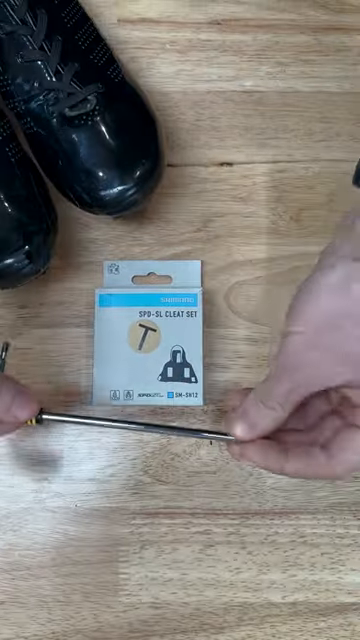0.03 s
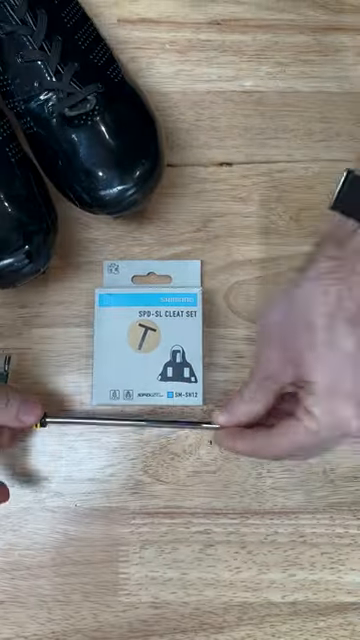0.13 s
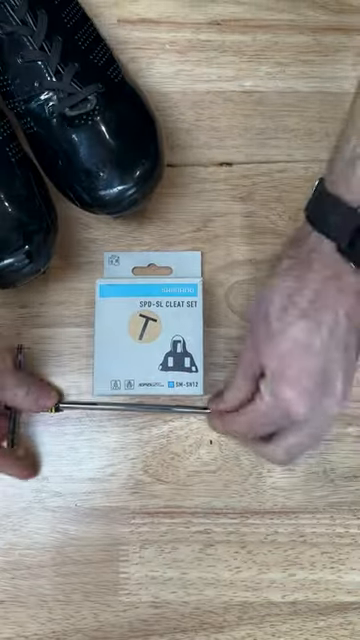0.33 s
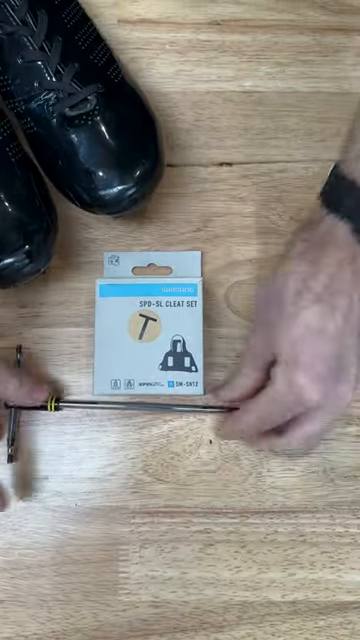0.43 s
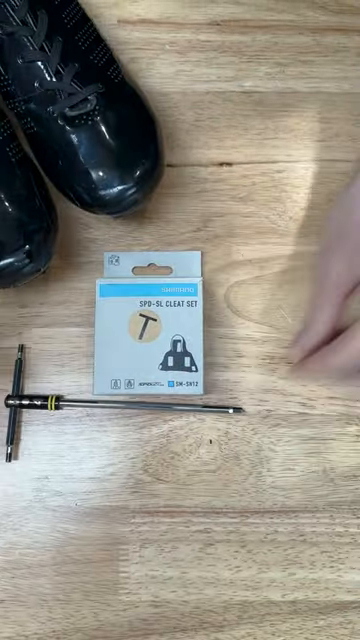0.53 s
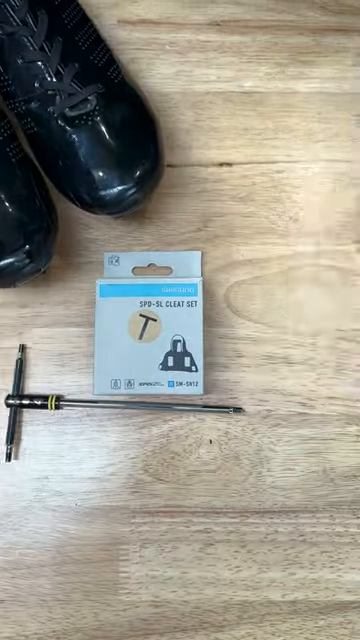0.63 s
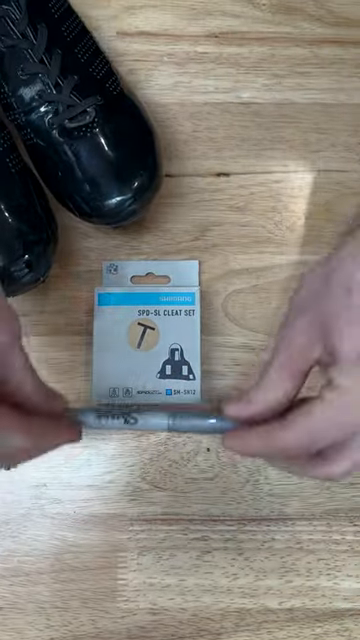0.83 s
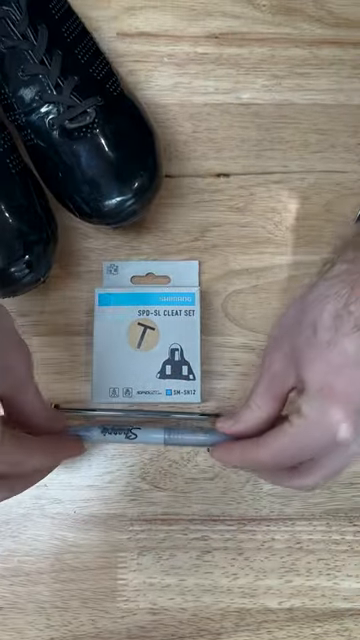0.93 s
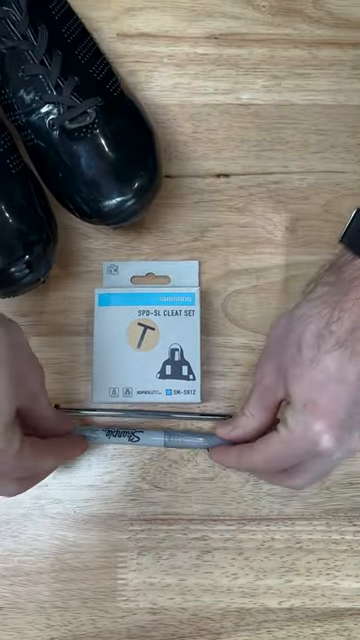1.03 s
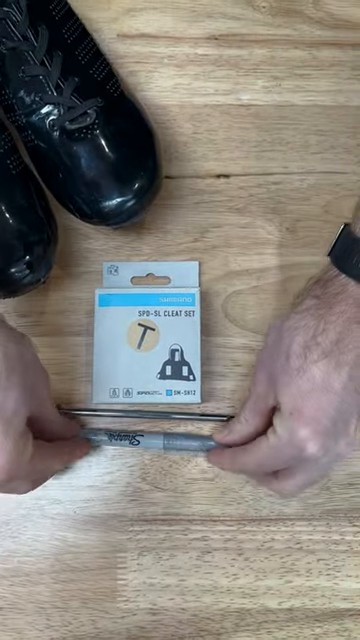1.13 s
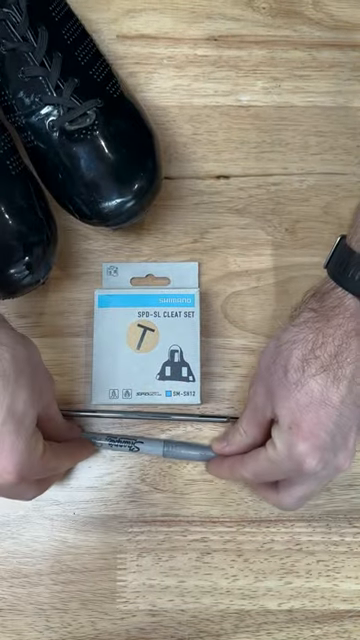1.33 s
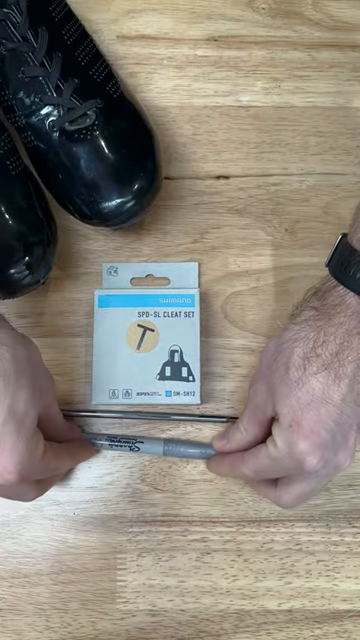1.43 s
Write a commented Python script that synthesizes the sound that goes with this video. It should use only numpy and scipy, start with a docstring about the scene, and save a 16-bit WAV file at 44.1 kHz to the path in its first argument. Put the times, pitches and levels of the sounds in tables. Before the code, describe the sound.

A metal wrench clatters onto a wooden floor, then a marker pen taps down softly.

```python
"""Hex wrench and marker on a wooden floor

In a quiet room a steel T-handle wrench is laid down: one end touches and slides, the shaft clatters
and rings, the heavy handle thuds on the boards and its sliding bar rattles. A light knock and a tick
follow, then a plastic marker pen lands with a softer double tap. A close stereo microphone hears
each contact crack on the wood, and the floor and the room ring."""
import sys
import numpy as np
from scipy import signal
from scipy.io import wavfile

SR = 44100
rng = np.random.default_rng(int(sys.argv[2]) if len(sys.argv) > 2 else 0)


def put_to_file(sound):
    """Save the sound as 16-bit audio at rate SR, in the file named by the first command-line argument."""
    columns = np.atleast_2d(sound).T  # one column per channel
    safe = np.clip(columns, -1, 1)
    whole_steps = np.round(safe * 32767)
    wavfile.write(sys.argv[1], SR, whole_steps.astype(np.int16))


N = 66150
TIME = np.arange(N) / SR
CUTOFF_HZ = 16300

# colour of the wood under the wrench, and under its tip: (frequency [Hz], level [dB per Hz])
STEEL_ON_FLOOR = [(60, -10), (220, 4.5), (320, -3.5), (460, 2), (750, -3.5), (1300, 6.5), (2150, -6.5),
                  (2700, -4), (3600, -28), (6000, -18), (9000, 1.5), (13000, -16), (15500, -13)]
TIP_ON_FLOOR = [(100, -14), (260, -18), (450, 0), (850, 8), (1100, 2), (1600, 4), (2600, 1), (3900, -4),
                (5500, -9.5), (9000, -0.5), (12000, -25.5), (14500, -1)]
# stereo width of the room: (frequency [Hz], side to mid [dB])
ROOM_WIDTH = [(130, -17), (250, -10), (500, 0), (1500, -1), (10000, -0.5)]


def from_db(db):
    """Decibels to gain."""
    return 10 ** (np.asarray(db) / 20)


def at_hz(points, hz):
    """Read a curve on a log-frequency axis."""
    freqs, values = np.array(points).T
    return np.interp(np.log(hz), np.log(freqs), values)


def dying(t, t60):
    """Exponential decay, 60 dB down after t60 seconds."""
    return np.exp(-np.log(1000) * t / t60)


def swell(peak_s, width_s):
    """A smooth rise and fall around a moment."""
    return np.exp(-((TIME - peak_s) / width_s) ** 2 / 2)


def panned(db):
    """Left and right gains for a level difference."""
    return from_db(np.array([[db], [-db]]) / 2)


def filtered(x, hz, kind="low", order=2):
    """Butterworth filter."""
    return signal.sosfilt(signal.butter(order, hz, kind, fs=SR, output="sos"), x + 1e-18)


def through(x, response):
    """Play a force or a sound through a stereo response."""
    return signal.fftconvolve(np.atleast_2d(x), response, axes=1)[:, :N]


def bands(width, size):
    """Yield (centre [Hz], stereo noise) in third octaves, spread by a width curve."""
    edges = 20.4 * 2 ** (np.arange(30) / 3)
    run_in = 4000  # samples for the filters to settle
    white = rng.standard_normal((2, 2, size + run_in))
    for k, (low, high) in enumerate(zip(edges, edges[1:])):
        mid, side = filtered(white[k % 2], [low, high], "band")[:, run_in:]
        hz = np.sqrt(low * high)
        spread = from_db(at_hz(width, hz))
        yield hz, np.array([mid + spread * side, mid - spread * side]) / np.hypot(1, spread)


def hiss(colour):
    """Steady coloured stereo noise, rms 1."""
    noise = sum(from_db(at_hz(colour, hz)) * band for hz, band in bands(ROOM_WIDTH, N))
    return noise / noise.std()


def room_tone():
    """Still air, rumble and a low hum."""
    # colour of the air: (frequency [Hz], level [dB per Hz])
    air = [(25, -17), (58, 1.5), (85, -3), (120, -1.5), (200, -9), (350, -20.5), (700, -21.5), (1400, -37),
           (3200, -45.5), (5700, -35.5), (9000, -54.5), (12000, -53), (16000, -75.5)]
    hum = np.sqrt(2) * np.sin(2 * np.pi * (118.5 * TIME + rng.random()))
    return from_db(-57.5) * hiss(air) + from_db(-61.5) * hum


def soft_swells():
    """A faint hiss swells just before the first touch; later the arms brush as the hands return."""
    # colours of the hiss and the brush: (frequency [Hz], level [dB per Hz])
    hiss_colour = [(300, -20), (900, 2.5), (2000, -1), (4000, -8), (8000, -11), (15000, -21)]
    brush_colour = [(100, -19), (300, -11), (650, 13.5), (1000, -11), (1550, 1.5), (2200, -36), (8000, -44),
                    (16000, -52)]
    faint_hiss = from_db(-75.5) * swell(peak_s=0.15, width_s=0.157) * hiss(hiss_colour)
    brush = from_db(-66.5) * swell(peak_s=1.0, width_s=0.13) * hiss(brush_colour)
    return faint_hiss + brush


def room(colour):
    """Diffuse tail of a blow with this colour, building up and dying band by band."""
    # tone of the reverb: (frequency [Hz], level [dB])
    tone = [(100, -8.5), (400, 1.5), (1200, -3), (2500, -4), (5000, -0.5), (10000, -18.5), (15000, -22.5)]
    # length of the reverb: (frequency [Hz], t60 [s])
    decay = [(100, 0.69), (500, 0.83), (1500, 0.42), (3000, 0.36), (7000, 0.16), (14000, 0.49)]
    build_up = 1 - np.exp(-TIME / 0.0071)
    tail = 0
    for hz, noise in bands(ROOM_WIDTH, N):
        fade = dying(TIME, at_hz(decay, hz)) * build_up
        gain = from_db(at_hz(colour, hz) + at_hz(tone, hz)) * panned(-0.5)
        tail += gain * noise * fade / np.linalg.norm(fade)
    return tail


def wood(colour, bass_ring_s=0.025):
    """Crowded, quickly damped modes, new for each place that is struck; the treble dies first."""
    # close-up stereo width: (frequency [Hz], side to mid [dB])
    width = [(150, -25), (450, -5), (1500, -3.5), (5000, 6), (10000, -2.5)]
    # close-up balance: (frequency [Hz], left-right [dB])
    balance = [(150, 1), (450, -0.33), (1200, -1.3), (5000, -1.2)]
    t = TIME[:SR // 10]
    crack = 0
    for hz, noise in bands(width, len(t)):
        fade = dying(t, t60=0.01 + bass_ring_s / (1 + hz / 2500))
        gain = from_db(at_hz(colour, hz)) * panned(at_hz(balance, hz))
        crack += gain * noise * fade / np.linalg.norm(fade)
    return crack


def body(modes):
    """A struck body's ring: decaying sines, each with its own pan."""
    return sum(from_db(db) * panned(pan) * np.sin(2 * np.pi * hz * TIME) * dying(TIME, t60)
               for hz, db, t60, pan in modes)


def steel(force, modes, line_width_hz):
    """High modes, blurred by the steel's chatter, reach left and right out of phase and fill the room."""
    # reverb send of the steel: (frequency [Hz], level [dB])
    send = [(4000, -7.5), (7700, -3), (10500, -23), (15000, -4)]
    response = 0
    for hz, db, t60, phase in modes:
        wander = np.cumsum(rng.standard_normal(N)) * np.sqrt(2 * np.pi * line_width_hz / SR)
        partial = np.sin(2 * np.pi * hz * TIME + wander + np.array([[0], [phase]]))
        response += from_db(db) * partial * dying(TIME, t60)
    attack = 1 - np.exp(-TIME / 0.00049)
    ring = through(force, response * attack)
    return ring + through(ring[0], room(send))


def contact(time_s, db, bright_hz=CUTOFF_HZ):
    """One push, with its own level and brightness."""
    force = np.zeros(N)
    force[int(time_s * SR)] = from_db(db)
    return filtered(force, bright_hz)


def blows(hits, colour, ring, room_db, bass_ring_s=0.025):
    """Each contact cracks on the wood; together they ring the body and the room."""
    forces = [contact(*hit) for hit in hits]
    cracks = sum(through(force, wood(colour, bass_ring_s)) for force in forces)
    return cracks + through(sum(forces), ring + from_db(room_db) * room(colour))


def settling():
    """The wrench comes to rest with a light knock; a dull bump follows through the floor."""
    # contacts: (time [s], level [dB], brightness [Hz])
    knocks = [(0.6142, -23, 2600), (0.6180, -23.5, 2008), (0.6228, -22.5, 1940)]
    bumps = [(0.838, -19, 108.3)]
    # colour of the wood under each: (frequency [Hz], level [dB per Hz])
    knock_colour = [(100, -21), (300, -13), (650, 4.5), (1100, 8), (2000, 1), (3100, -7), (4200, -24),
                    (12000, -10)]
    bump_colour = [(30, -11.5), (62, 1), (120, -10), (190, 10), (400, 4)]
    # floor modes under the knock: (frequency [Hz], level [dB], t60 [s], left-right [dB])
    floor = [(412.3, -35, 0.45, -7.5), (1092, -35.5, 0.19, -4), (1900, -50, 0.063, -6)]
    knock = blows(knocks, knock_colour, body(floor), room_db=-0.5)
    push = sum(contact(*bump) for bump in bumps)
    return knock + through(push, wood(bump_colour, bass_ring_s=0.2))


def marker():
    """The marker's hollow barrel lands with a tap, then its hard cap clicks down."""
    # plastic meets floor: (time [s], level [dB], brightness [Hz])
    taps = [(1.1775, -5.5, 894), (1.1880, -10.5, 989), (1.1928, -12.5, 3397)]
    # colour of the wood under plastic: (frequency [Hz], level [dB per Hz])
    colour = [(60, -11.5), (190, -5), (280, -6.5), (420, 4), (750, 5.5), (1200, 5.5), (1800, -5),
              (2450, -3), (3100, -9), (4000, -9.5), (5700, -5), (9500, 5), (12000, -30), (14500, 5)]
    # modes of barrel and cap: (frequency [Hz], level [dB], t60 [s], left-right [dB])
    barrel = [(382, -42, .13, -4), (458, -33, 0.1, -3.5), (670, -39.5, .045, 0), (680, -52, .6, 2.5),
              (921, -43, .12, -4), (1105, -45, 0.22, 3)]
    cap = [(2440, -30, 0.0097, 0), (4060, -24.5, 0.0093, -3), (5530, -34, 0.018, -6), (14200, -37, .07, -6)]
    return blows(taps, colour, body(barrel) + body(cap), room_db=0, bass_ring_s=0.18)


def snaps():
    """Sharp transients straight from the points of contact, and one lone tick."""
    # single pulses: (time [s], level [dB], low edge [Hz], high edge [Hz])
    pulses = [(0.2435, -7.5, 1100, 3240), (0.2802, -15.5, 7400, 16200), (0.2857, -5.5, 588, 1893),
              (0.8239, -46.5, 800, 10000), (1.1778, -36.5, 3060, 8000), (1.1931, -24, 2100, 5950)]
    return sum(filtered(contact(s, db), [low, high], "band", order=3) for s, db, low, high in pulses)


def bar_rattle():
    """The loose bar ticks against the handle, steel on steel, and then rings freely."""
    # bar meets handle: (time [s], ring level [dB], click level [dB])
    ticks = [(0.3835, -8, -48), (0.3875, 1.5, -22.5), (0.3905, -21, -44), (0.4020, 0, -57),
             (0.4062, 1.5, -52)]
    # bar modes: (frequency [Hz], level [dB], t60 [s], left-right phase [rad])
    bar = [(4425, -58, 0.085, 0.63), (7650, -64, 0.11, 1.1), (10470, -55, .16, 2.4),
           (10660, -41, 0.08, 2.44), (11715, -42, 0.075, 2.65)]
    ring_force = sum(contact(s, db) for s, db, _ in ticks)
    click_force = sum(contact(s, db) for s, _, db in ticks)
    return steel(ring_force, bar, line_width_hz=8) + through(click_force, wood(STEEL_ON_FLOOR))


def tip_touch():
    """The wrench's tip touches first and skips on the board."""
    # tip meets wood: (time [s], level [dB], brightness [Hz])
    skips = [(0.2428, -9, 4370), (0.2487, -17.5, 13500), (0.2513, -14, 3480), (0.2645, -22, 1500),
             (0.2672, -28, 5000)]
    # board modes under the tip: (frequency [Hz], level [dB], t60 [s], left-right [dB])
    board = [(870, -33, .06, -2), (4300, -42, .025, 0)]
    return blows(skips, TIP_ON_FLOOR, body(board), room_db=0.5, bass_ring_s=0.049)


def tip_slide(start_s=0.245, end_s=0.274, grains_per_s=2100):
    """The tip scrapes over the grain before the shaft drops."""
    grains = (rng.random(N) < grains_per_s / SR) * rng.standard_normal(N)
    sliding = (TIME > start_s) & (TIME < end_s)
    force = filtered(grains * sliding, hz=9000, order=1)
    return from_db(-29) * through(force, wood(TIP_ON_FLOOR))


def handle_thud():
    """The heavy handle lands and its weight shakes the floor."""
    # handle meets wood: (time [s], level [dB], brightness [Hz])
    landings = [(0.28, -14, 456), (0.3000, -6, 594), (0.3047, 2.5, 344), (0.3125, -5, 228)]
    # deep floor modes: (frequency [Hz], level [dB], t60 [s], left-right [dB])
    floor = [(80, -51, .15, 0), (118, -43, .4, 0), (140.5, -43, 1.1, 0), (158, -38, .3, 0),
             (207, -46, .35, 0), (257, -40, .35, -1), (460, -40, .1, -6)]
    weight = sum(contact(*landing) for landing in landings)
    boom = through(weight, body(floor))
    knock = from_db(1.5) * through(weight, wood(STEEL_ON_FLOOR))
    return filtered(from_db(4.5) * weight + boom + knock, hz=74, kind="high")


def shaft_clatter():
    """The shaft bounces on the boards; each clack rings both wood and steel."""
    # shaft meets wood: (time [s], wood level [dB], steel level [dB], brightness [Hz])
    clacks = [(0.2745, 0.5, 6, 4000), (0.2789, -1, -0.5, 8000), (0.2813, 2, -17, 4500),
              (0.2834, -3.5, 5, 3360), (0.285, -5, 2.5, 2020), (0.2916, 0, -41, 1500),
              (0.297, -6, -38, 1740)]
    # floorboard modes: (frequency [Hz], level [dB], t60 [s], left-right [dB])
    board = [(258, -46, .42, -1), (383, -46, .4, -6), (453, -46, .55, -4), (472, -41.5, .16, -7),
             (500, -49, .45, -4), (640, -52, .4, -2), (893, -49, .38, -3), (1094, -37.5, .28, -2),
             (1248, -54, .3, -1), (1345, -47, .3, -1), (1431, -54, .25, -1), (1580, -58, .35, 0),
             (2620, -42, .05, -2), (2740, -43, .05, -2), (2870, -53, .22, -2)]
    # shaft modes: (frequency [Hz], level [dB], t60 [s], left-right phase [rad])
    shaft = [(2625, -41.5, 0.022, 0.305), (4545, -51.5, 0.0401, 0.51), (7695, -46.5, 0.19, 1.0),
             (8600, -49, .05, 1.6), (9265, -57, 0.1, 1.6), (10340, -31.5, 0.01627, 2.5),
             (10596, -23.5, 0.023, 2.36), (10840, -45.5, 0.179, 3), (11800, -40.5, .025, 2.1),
             (11760, -50.5, 0.024, 1.983), (14000, -59, 0.061, 1.1), (15300, -52, 0.066, 0.86)]
    wood_hits = [(s, db, hz) for s, db, _, hz in clacks]
    clatter = blows(wood_hits, STEEL_ON_FLOOR, from_db(-5) * body(board), room_db=2)
    steel_force = sum(contact(s, db) for s, _, db, _ in clacks)
    return filtered(clatter, hz=74, kind="high") + steel(steel_force, shaft, line_width_hz=25)


def scene():
    """Wrench, marker and quiet room, mixed at the microphone."""
    wrench = tip_touch() + shaft_clatter() + handle_thud() + tip_slide() + bar_rattle() + settling()
    return wrench + snaps() + marker() + soft_swells() + room_tone()


def record(dry):
    """The microphone has a dip in the top octave; above it the treble is cut steeply."""
    dip_hz, dip_width_hz = 12700, 5700
    dipped = signal.lfilter(*signal.iirnotch(dip_hz, dip_hz / dip_width_hz, fs=SR), dry)
    return signal.sosfilt(signal.ellip(10, .1, 80, CUTOFF_HZ, fs=SR, output="sos"), dipped)


dry = scene()
out = record(dry)
put_to_file(out)
```